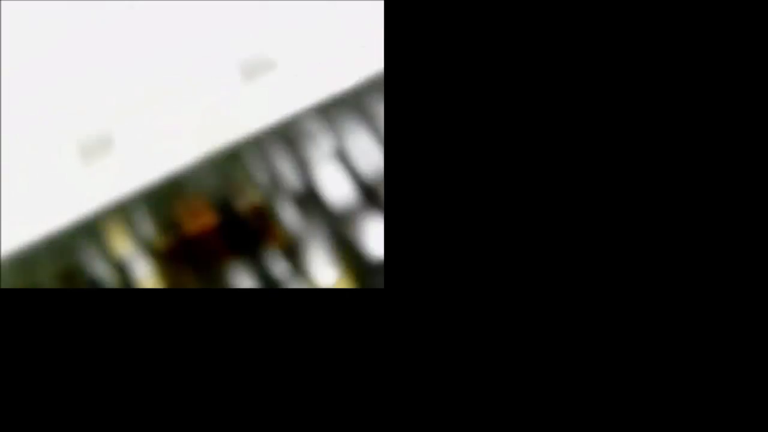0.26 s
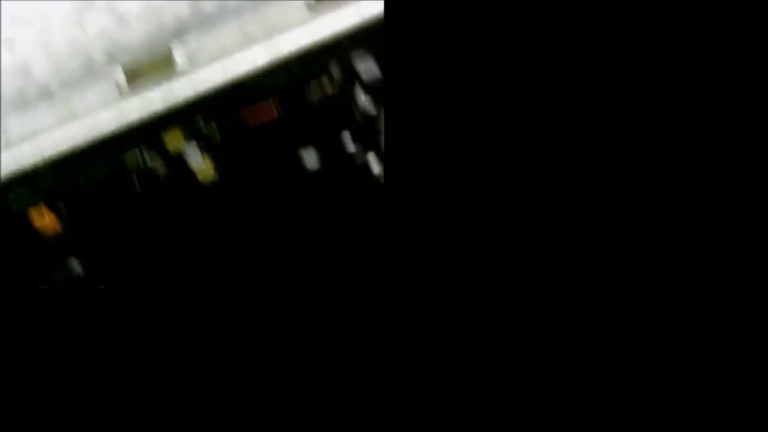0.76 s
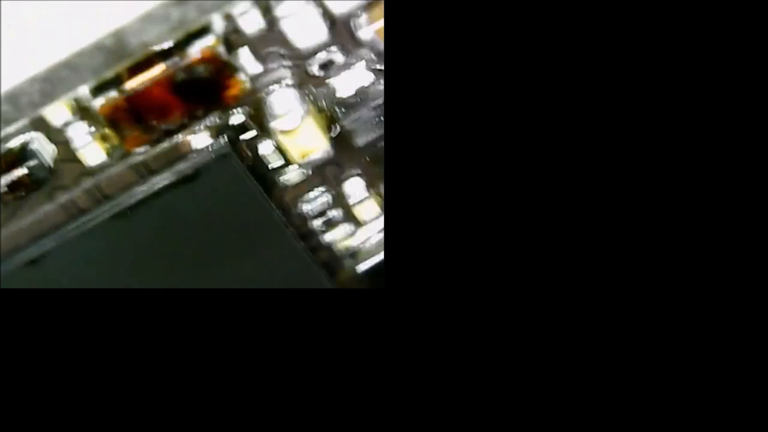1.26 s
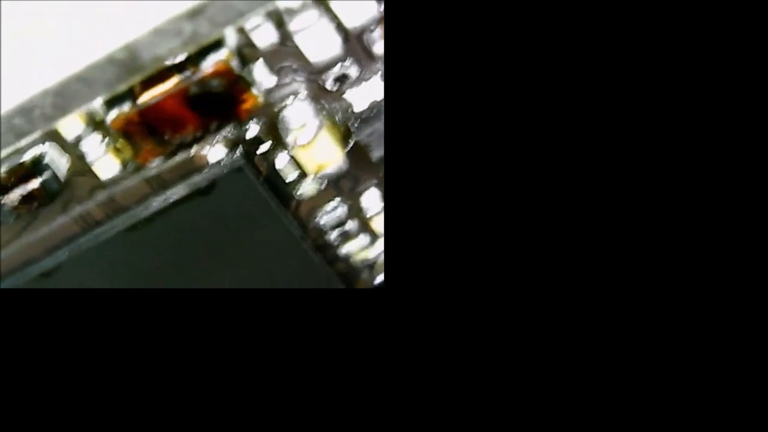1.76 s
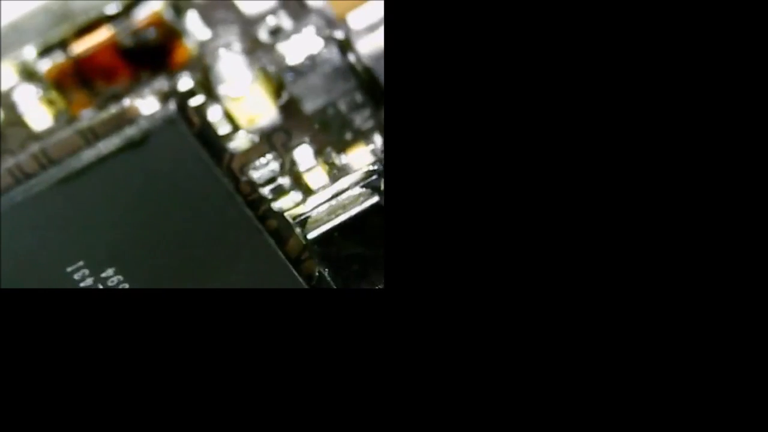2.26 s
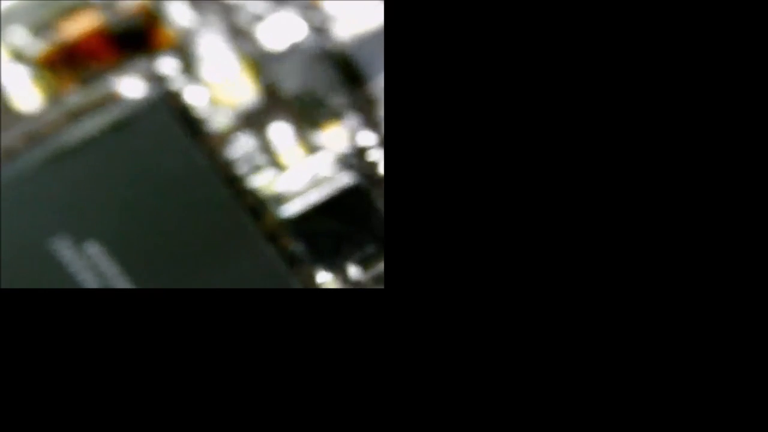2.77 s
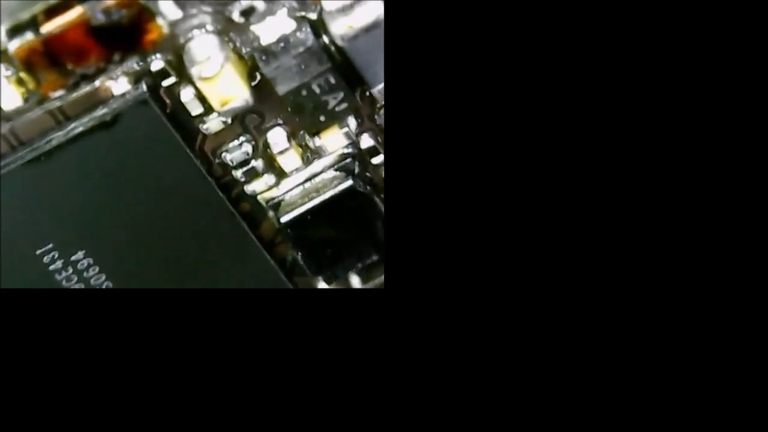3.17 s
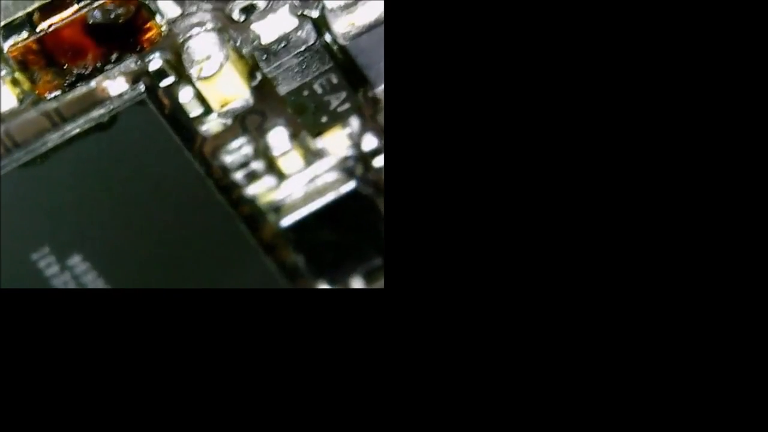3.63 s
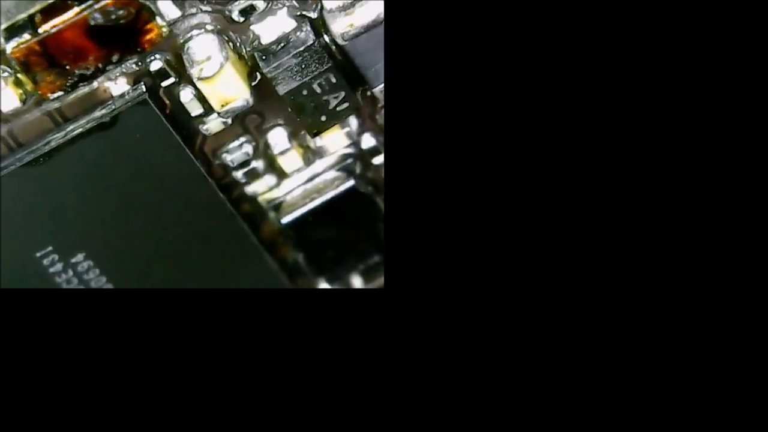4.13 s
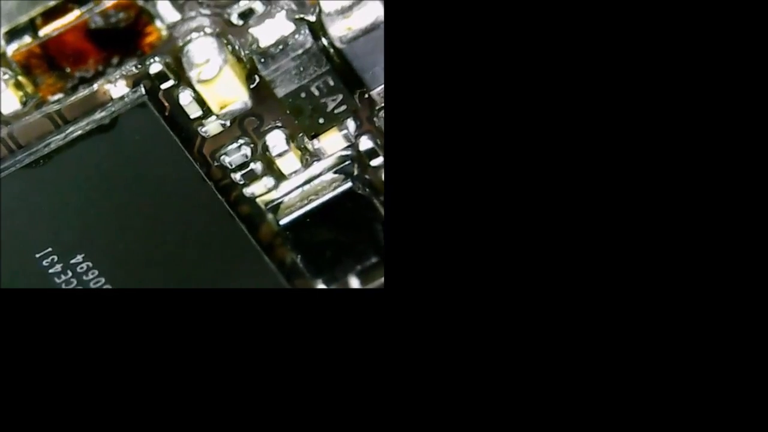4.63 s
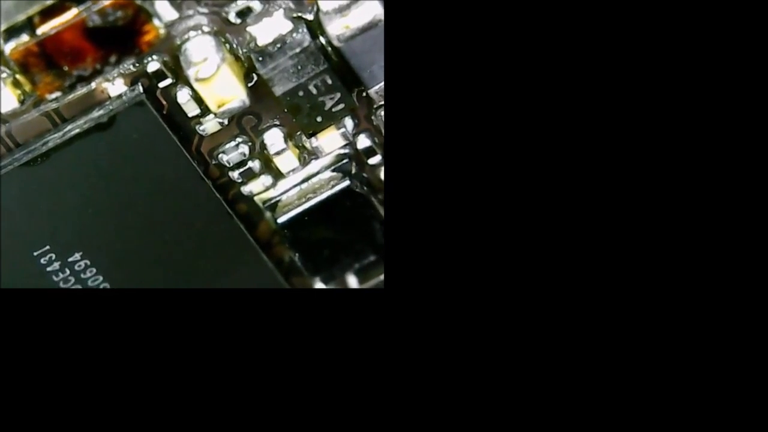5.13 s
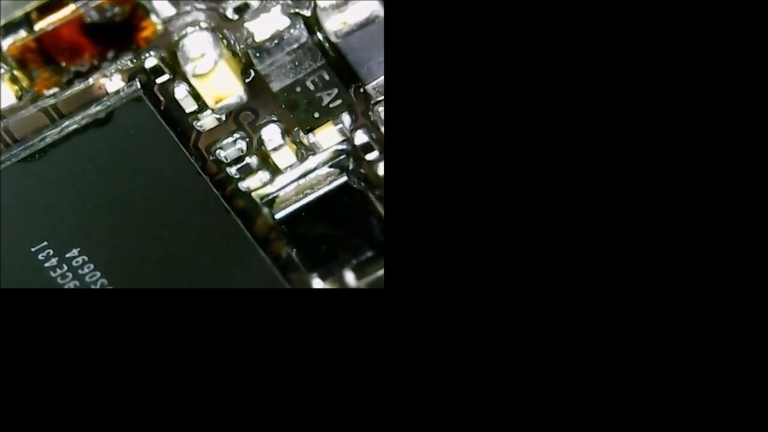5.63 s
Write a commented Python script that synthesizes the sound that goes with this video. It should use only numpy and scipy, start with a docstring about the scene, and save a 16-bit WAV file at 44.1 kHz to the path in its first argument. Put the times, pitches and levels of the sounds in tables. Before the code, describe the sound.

Small plastic catch clicks at regular intervals, two of them hard, over a quiet mains hum and fan hiss, after a brief very high squeak.

```python
"""A small plastic catch clicks about every 0.86 s, twice hard: shell, lid and board modes struck by each contact.
A lighter part ticks higher now and then; a rubbed edge squeaks once near 12 kHz at the start, a wandering sine.
Behind them mains gear hums, a sum of sines at mains multiples, over a fan's rush of shaped noise.
The fan housing, resonant noise near 1.2 kHz, shakes unevenly; a loose part taps it at the stronger shakes.
A faint treble swish of noise comes near the end. A quiet workbench indoors."""
import sys
import numpy as np
from scipy import signal
from scipy.fft import rfft, irfft, next_fast_len
from scipy.io import wavfile
from scipy.ndimage import uniform_filter1d, map_coordinates

SR = 44100
rng = np.random.default_rng(int(sys.argv[2]) if len(sys.argv) > 2 else 0)


def materialize(psi):
    """Save the field psi as 16-bit PCM at rate SR to the path in sys.argv[1].

    A 1-D psi becomes a single channel; in a 2-D psi each row is a channel.
    """
    bounded = np.clip(np.atleast_2d(psi).T, -1, 1)
    quanta = np.round(bounded * 32767).astype(np.int16)
    wavfile.write(sys.argv[1], SR, quanta)


N = 260140


def amp(db):
    """Gain of a level in dB."""
    return 10 ** (np.asarray(db) / 20)


def unit(x):
    """x at rms 1."""
    return x / np.sqrt(np.mean(x ** 2) + 1e-20)


def along(points, hz):
    """Values of (Hz, value) points, interpolated on a log frequency axis."""
    point_hz, value = np.transpose(points)
    return np.interp(np.log(hz + 1), np.log(point_hz + 1), value)


def curves(rows):
    """One value per sample for each column after the time."""
    time_s, *columns = np.transpose(rows)
    return [np.interp(np.arange(N) / SR, time_s, column) for column in columns]


def during(rows):
    """1 while a table lasts, else 0, with 4 ms ramps."""
    t = np.arange(N) / SR
    first_s, last_s = rows[0][0], rows[-1][0]
    return np.interp(t, [first_s, first_s + .004, last_s, last_s + .004], [0, 1, 1, 0])


def wobble(knots_per_s):
    """A smooth random curve through normal knots."""
    knots = rng.standard_normal(int(N * knots_per_s / SR) + 4)
    coarse = np.arange(0, N + 16, 16)  # in samples
    smooth = map_coordinates(knots, [coarse * knots_per_s / SR])
    return np.interp(np.arange(N), coarse, smooth)


def filtered(x, response):
    """x through a response given as a function of Hz."""
    m = next_fast_len(len(x) + SR // 2)
    spectrum = rfft(x, m) * response(np.fft.rfftfreq(m, 1 / SR))
    return irfft(spectrum, m)[:len(x)]


def resonant(peaks):
    """White noise through parallel resonances of alternating sign, rms 1."""
    def response(hz):
        total = 0
        for k, (centre_hz, width_hz, db) in enumerate(peaks):
            damping = 1j * hz * width_hz
            total = total + (-1) ** k * amp(db) * damping / (centre_hz ** 2 - hz ** 2 + damping)
        return total
    return unit(filtered(rng.standard_normal(N), response))


def ring(modes, spread_db, attack_s):
    """One blow on decaying modes of random strength and phase; contact force builds up smoothly."""
    t = np.arange(SR // 16) / SR
    tones = 0
    for hz, db, t60_s in modes:
        decay = amp(db + rng.normal(0, spread_db) - 60 * t / t60_s)
        tones = tones + decay * np.sin(2 * np.pi * (hz * t + rng.random()))
    return tones * np.sin(np.pi / 2 * np.clip(t / attack_s, 0, 1)) ** 2


# Decay of the noisy tail by frequency. Each row: frequency in Hz, t60 in s.
TAIL_T60 = [(800, .1), (5000, 0.11), (9000, .07), (12400, 0.14)]


def noisy_tail(x, last_s):
    """A short noisy tail after each sound: decaying noise that thins out fast after last_s."""
    hz, t, z = signal.stft(rng.standard_normal(SR // 6), SR, nperseg=128)
    fade_db = -60 * t / along(TAIL_T60, hz)[:, None] - 1800 * np.clip(t - last_s, 0, 1)
    tail = signal.istft(z * amp(fade_db), SR, nperseg=128)[1]
    delayed = np.pad(x, (150, 0))
    return signal.fftconvolve(delayed, tail / np.linalg.norm(tail))[:len(x)]


def standing(x, depth_db, spacing_hz):
    """Standing waves of the room give a steady sound a fixed, finely rippled colour."""
    knots = rng.standard_normal(SR // 20)
    return unit(filtered(x, lambda hz: amp(depth_db * map_coordinates(knots, [hz / spacing_hz]))))


def add(track, start_s, sound):
    """Mix a sound in at start_s."""
    part = track[round(start_s * SR):][:len(sound)]
    part += sound[:len(part)]


MAINS_HZ = 59.99
# Audible mains overtones. Each entry: multiple of the mains.
HUM_ORDERS = [1, 2, 3, 4, 5, 6, 7, 8, 9, 10, 11, 12, 13, 14, 15, 16, 17, 19, 21, 22, 25, 26, 27, 29, 30, 33,
              37, 38, 45, 52, 58, 64, 69, 79]
# Strength of those overtones, same order. Each entry: rms level in dB before breathing.
HUM_DB = [-78.5, -61, -62, -53, -64.5, -76, -77.5, -69, -70, -67, -60.5, -71, -74.5, -68, -62.5, -74.5, -78,
          -70.5, -69.5, -73, -69, -61, -72.5, -77, -71, -75.5, -73.5, -76, -78.5, -83, -78, -82, -83, -83]


def hum():
    """Iron and windings shake at whole multiples of the mains, each breathing a little."""
    turn = 2 * np.pi * MAINS_HZ * np.arange(N) / SR
    out = np.zeros(N)
    for order, db in zip(HUM_ORDERS, HUM_DB):
        level = np.sqrt(2) * amp(db + 0.66 * wobble(5.7))
        out += level * np.sin(order * turn + rng.uniform(0, 2 * np.pi))
    return out


HOUSING_DB, UNEVEN_DB, UNEVEN_PER_S = -57.5, 2, 16  # steady shake: centre level, swing, knot rate
RATTLE_DB, RATTLE_PER_S = 3, 130  # fine grain: swing, knot rate
SHAKE_RISE, SHAKE_FALL_DB = .3, 12  # rising share of the length; drop at both ends
# Stronger shakes of the housing. Each row: peak time in s, level in dB before grain, length in s.
SHAKES = [(.0378, -43, .025), (.1057, -49.5, .07), (.215, -50, .08), (0.296, -50.5, .05),
          (0.493, -48.5, .04), (.60, -53, .2), (0.859, -47.5, 0.028), (0.91, -49.5, .06),
          (0.957, -45, 0.043), (1.004, -50, .03), (1.4301, -50, .05), (1.917, -47.5, .04),
          (2.73, -50.5, .06), (3.70, -52.5, .05), (3.839, -47, .04), (4.0527, -49, .05), (4.16, -47, .04),
          (4.695, -48, .04), (4.946, -50, .05), (5.005, -50, .05), (5.7124, -50, .05)]


def shaking():
    """Gain of the housing: an uneven, grainy shake plus stronger ones that rise fast and fall slower."""
    t = np.arange(N) / SR
    level_db = HOUSING_DB + UNEVEN_DB * wobble(UNEVEN_PER_S)
    for peak_s, db, length_s in SHAKES:
        away = np.maximum((peak_s - t) / SHAKE_RISE, (t - peak_s) / (1 - SHAKE_RISE)) / length_s
        level_db = np.maximum(level_db, db - SHAKE_FALL_DB * away ** 2)
    return amp(level_db + RATTLE_DB * wobble(RATTLE_PER_S))


AIR_GAIN_DB = -59.5  # common to rush, hiss and duct
# Spectrum of the broad rush. Each row: frequency in Hz, relative density in dB per Hz.
RUSH_SPECTRUM = [(15, -60), (25, -35.5), (70, -33), (110, -22.5), (200, -14), (280, -13), (390, -21),
                 (650, -13.5), (1060, -12.5), (1400, -13), (1700, -17.5), (2300, -20), (2800, -32.5),
                 (5000, -91)]
# Spectrum of the hiss, mostly air through the grille. Each row: frequency in Hz, relative density in dB per Hz.
HISS_SPECTRUM = [(1800, -20.5), (2500, -6), (3400, -3), (4400, 0.5), (5200, -3), (6000, -10), (6800, -13.5),
                 (7600, -13.5), (8600, -16), (9400, -26.5), (10200, -27), (11200, -32.5), (13000, -36.5),
                 (16000, -37)]
# Air resonances of the duct. Each row: centre in Hz, width in Hz, relative level in dB.
DUCT_PEAKS = [(192, 50, 0.5), (779, 86, -7.5), (866.6, 40, 6), (980, 50, -8), (1569, 56, -1.5),
              (1884, 110, -1), (2052, 188, -7), (3480, 40, -11.5), (4320, 90, -10.5), (4520, 35, -12),
              (4830, 90, -12), (7380, 250, -19), (8260, 300, -24)]
# Resonances of the fan housing. Each row: centre in Hz, width in Hz, relative level in dB.
HOUSING_PEAKS = [(1181, 67, 1), (1271, 77, -2)]


def fan():
    """Broad rush, hiss, air ringing in the duct, and the housing, shaken in uneven bursts."""
    rush = unit(filtered(rng.standard_normal(N), lambda hz: amp(along(RUSH_SPECTRUM, hz))))
    hiss = unit(filtered(rng.standard_normal(N), lambda hz: amp(along(HISS_SPECTRUM, hz))))
    duct = filtered(resonant(DUCT_PEAKS), lambda hz: 1 / (1 + (hz / 8500) ** 8))
    air = amp(5) * standing(rush, 2.5, 45) + amp(-0.5) * standing(hiss, 2.7, 55) + amp(2) * duct
    air_gain = amp(AIR_GAIN_DB + 0.64 * wobble(12))
    housing = filtered(resonant(HOUSING_PEAKS), lambda hz: 1 / (1 + ((hz - 1210) / 260) ** 4))
    return air_gain * air + shaking() * unit(housing)


TAP_DB, TAP_T60_S = 10.5, .022  # gain over the shake level; decay


def taps():
    """At the peak of each stronger shake a loose part taps the housing, ringing its modes."""
    out = np.zeros(N)
    modes = [(hz, db, TAP_T60_S) for hz, _, db in HOUSING_PEAKS]
    for peak_s, shake_db, _ in SHAKES:
        add(out, peak_s, amp(shake_db + TAP_DB) * ring(modes, 1, 0.001))
    return out


# Course of the faint swish. Each row: time in s, level in dB.
SWISH_LEVEL = [(5.826, -98), (5.852, -68.5), (5.899, -87)]


def swish():
    """A brief swish of treble noise, rolling off toward the top."""
    noise = resonant([(11000, 3200, 0)])
    treble = unit(filtered(noise, lambda hz: (hz > 8800) / (1 + (hz / 13500) ** 12)))
    return amp(curves(SWISH_LEVEL)[0]) * during(SWISH_LEVEL) * treble


# Course of the squeak. Each row: time in s, centre pitch in Hz, level in dB before flutter.
SQUEAK_COURSE = [(.044, 11950, -60), (.051, 11980, -30.5), (.072, 12400, -30), (.090, 12220, -29.5),
                 (.098, 12450, -40), (.103, 12550, -28.5), (.109, 12500, -33), (.118, 12400, -50),
                 (.215, 12300, -95), (.228, 12240, -68), (.245, 12240, -90)]


def squeak():
    """A rubbed edge sings one fluttering high tone with a little scrape and a short noisy tail."""
    pitch_hz, db = curves(SQUEAK_COURSE)
    gain = amp(uniform_filter1d(db, size=SR // 400)) * during(SQUEAK_COURSE)
    phase = 2 * np.pi * np.cumsum(pitch_hz + 50 * wobble(200)) / SR
    tone = np.sqrt(2) * np.sin(phase) * amp(2.5 * wobble(240))
    scrape = unit(filtered(rng.standard_normal(N), lambda hz: 1 / (1 + ((hz - 10800) / 900) ** 4)))
    direct = gain * (tone + amp(-40) * scrape)
    return direct + amp(-11.5) * noisy_tail(direct + amp(-28) * gain * scrape, last_s=.11)


# Blows on the lighter part. Each row: start in s, blow gain in dB.
TICKS = [(.430, -39.5), (.467, -60), (.744, -56), (.761, -57), (.814, -60), (.830, -44), (0.844, -45.5),
         (2.294, -54.5), (2.847, -55), (2.917, -57), (2.931, -42), (3.714, -39.5), (4.030, -48.5),
         (4.081, -51.5), (4.930, -49), (5.165, -41), (5.43, -49), (5.867, -50.5)]
# Modes of the lighter part. Each row: frequency in Hz, relative level in dB, t60 in s.
PIN_MODES = [(7180, 1, 0.016), (7290, -2.5, 0.013), (7630, -7.5, 0.014), (8300, -11, 0.016),
             (8570, -18, 0.0085)]


def ticks():
    """A lighter part ticks with a thin high ring and a short noisy tail."""
    out = np.zeros(N)
    for start_s, db in TICKS:
        blow = amp(db) * ring(PIN_MODES, 2.2, 0.00081)
        add(out, start_s, blow + amp(-3) * noisy_tail(blow, last_s=.022))
    return out


CHATTER_S, CHATTER_GAP_S = 2.5755, .0033  # start and spacing, within the hardest click
CHATTER_DB, CHATTER_KNOCK_DB, CHATTER_LOSS_DB = -27, -33, 1.2  # first shell, mean first knock, loss per contact
REBOUND_CRACK_DB = -16  # extra crack drop at all but a click's hardest contact
# Contacts inside the clicks. Each row: start in s, shell gain in dB, knock gain in dB.
CONTACTS = [(0.8433, -37, -43), (.852, -52, -46), (.861, -51, -47), (1.705, -32, -57), (1.7085, -13, -33),
            (1.7096, -17, -45), (1.7165, -21, -22), (1.7194, -19, -31), (1.727, -36, -34),
            (2.5661, -27, -6), (2.5682, -11.5, -40), (2.5712, -15, -18), (3.4283, -45, -60),
            (3.439, -51, -60), (4.2952, -44.5, -61), (4.307, -49, -58), (5.1619, -45, -60)]
# Clicks. Each row: start in s, knock pitch in Hz, knock swell in s, lid gain over the shell in dB,
# crack gain at the hardest contact in dB, tail gain in dB.
CLICKS = [(.84, 1140, .003, -12, -84, -4), (1.70, 1050, 0.0017, -16, -57, -18.5),
          (2.56, 972, 0.0047, -10, -43, -17), (3.42, 1060, .003, -9.5, -94, -1),
          (4.29, 1060, .003, -9, -90, -6), (5.16, 1060, .003, -8, -95, -3)]
# Modes of the catch's shell. Each row: frequency in Hz, relative level in dB, t60 in s.
SHELL_MODES = [(4680, -3, 0.012), (4890, 3.5, .008), (5254, 6.5, 0.0069), (5720, 3, 0.0084),
               (6200, -5.5, 0.0085), (7100, -8.5, 0.009), (7800, -15.5, .007), (8950, -20.5, 0.0065),
               (10080, -29, .006)]
# Modes of its lid. Each row: frequency in Hz, relative level in dB, t60 in s.
LID_MODES = [(1900, -15, 0.024), (2303, -2, 0.021), (2547, -5, 0.022), (2930, -2.5, 0.032),
             (3386, -1.5, 0.019), (3580, -3, 0.019), (4200, -2.5, 0.021)]
# Modes of the board below. Each row: offset above the knock pitch in Hz, relative level in dB, t60 in s.
BOARD_MODES = [(0, 1.5, 0.029), (209, -13, 0.034)]


def catch():
    """Each contact rings shell and lid, knocks the board below and cracks briefly; a noisy tail follows."""
    out, t = np.zeros(N), np.arange(SR // 16) / SR
    chatter = []
    for k in range(6):
        loss_db = k * CHATTER_LOSS_DB
        knock_db = CHATTER_KNOCK_DB - loss_db + rng.normal(0, 3)
        chatter.append((CHATTER_S + k * CHATTER_GAP_S, CHATTER_DB - loss_db, knock_db))
    for click_s, knock_hz, swell_s, lid_db, crack_db, tail_db in CLICKS:
        contacts = [row for row in CONTACTS + chatter if click_s <= row[0] < click_s + .1]
        hardest_db = max(row[1] for row in contacts)
        board = [(knock_hz + above_hz, db, t60_s) for above_hz, db, t60_s in BOARD_MODES]
        for start_s, shell_db, knock_db in contacts:
            sharp_db = crack_db + shell_db - hardest_db
            if shell_db < hardest_db:
                sharp_db += REBOUND_CRACK_DB
            # differenced noise, tilted to the treble, 4 ms t60
            crack = np.diff(rng.standard_normal(len(t) + 1)) * amp(sharp_db - 60 * t / .004)
            shell = amp(shell_db) * ring(SHELL_MODES, 1.16, 0.00073)
            lid = amp(shell_db + lid_db) * ring(LID_MODES, 2.1, 0.00086)
            knock = amp(knock_db) * ring(board, 0.41, swell_s)
            blow = shell + lid + knock
            add(out, start_s, blow + crack)
            add(out, start_s, amp(tail_db) * noisy_tail(blow, last_s=.019))
    return out


def scene():
    """All sources summed at one microphone."""
    background = hum() + fan() + taps() + swish()
    return (background + squeak() + ticks() + catch())[None]


TOP_HZ = 15750


def record(dry):
    """The recorder keeps nothing above its band limit."""
    return filtered(dry[0], lambda hz: hz < TOP_HZ)[None]


dry = scene()
out = record(dry)
materialize(out)
```